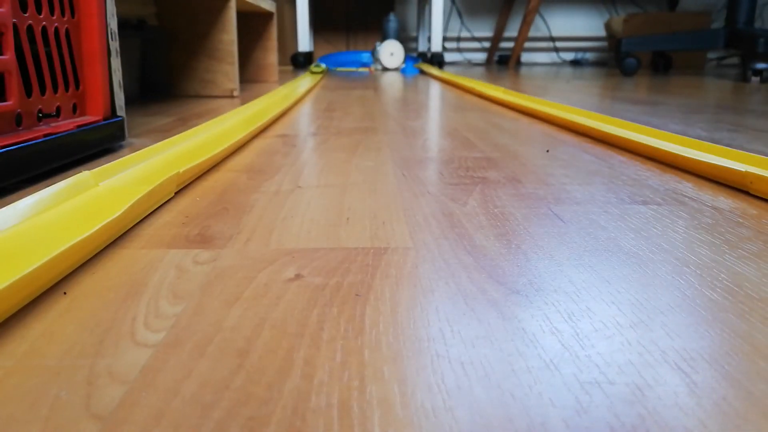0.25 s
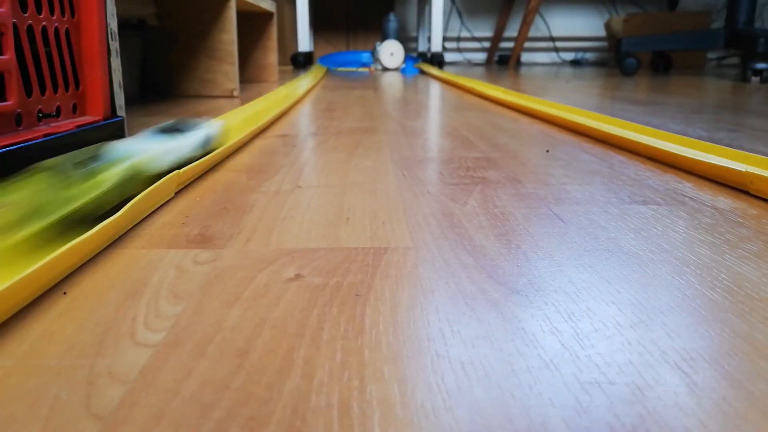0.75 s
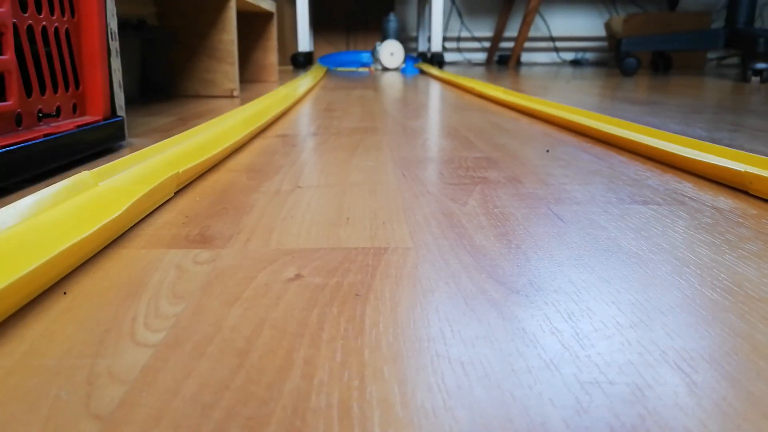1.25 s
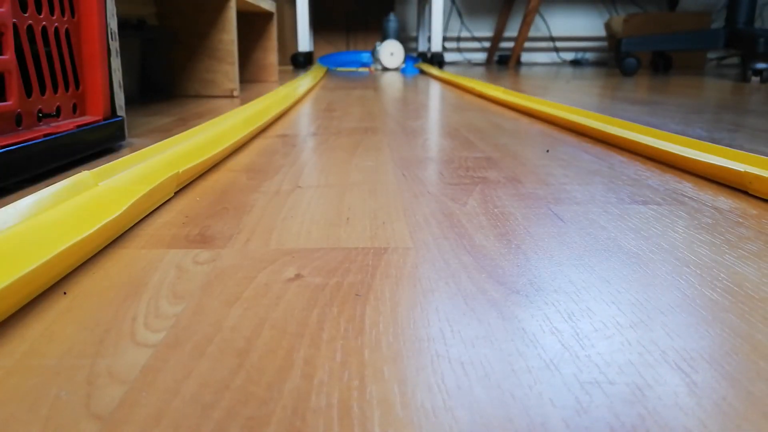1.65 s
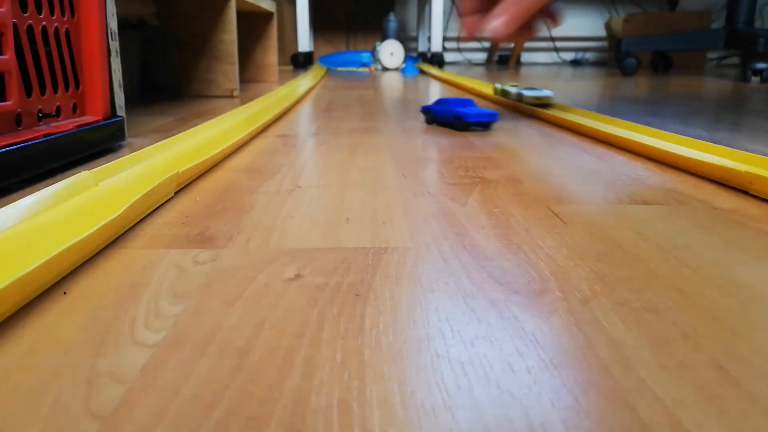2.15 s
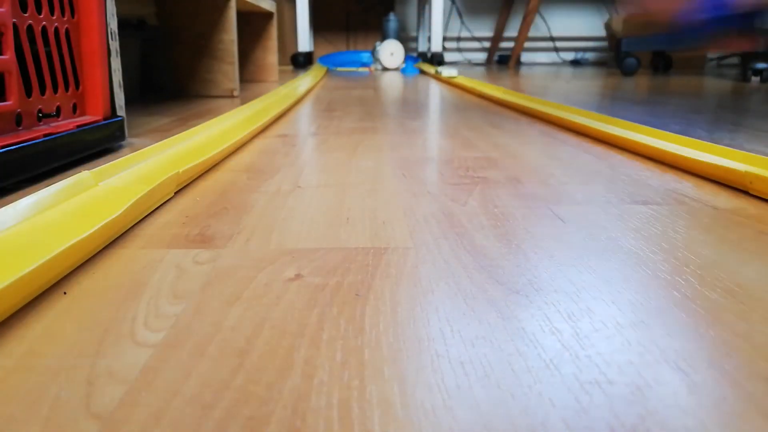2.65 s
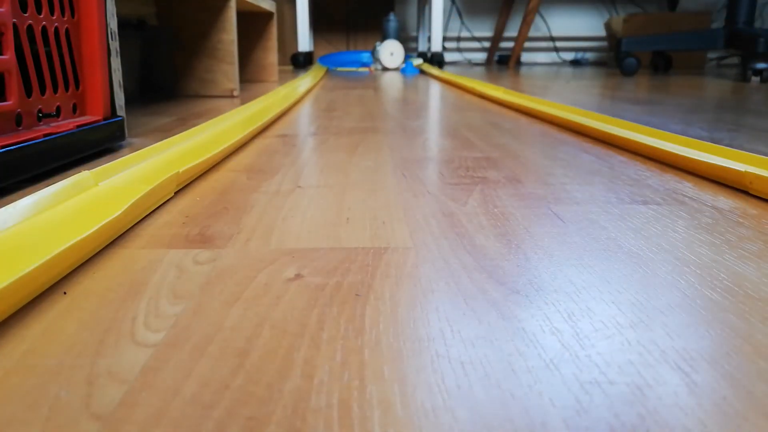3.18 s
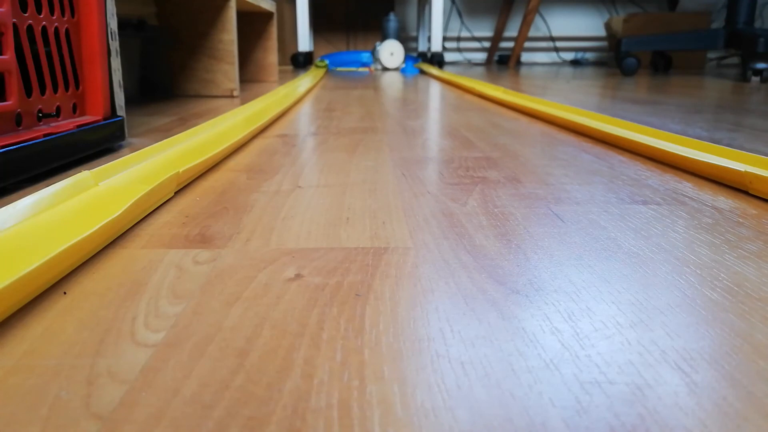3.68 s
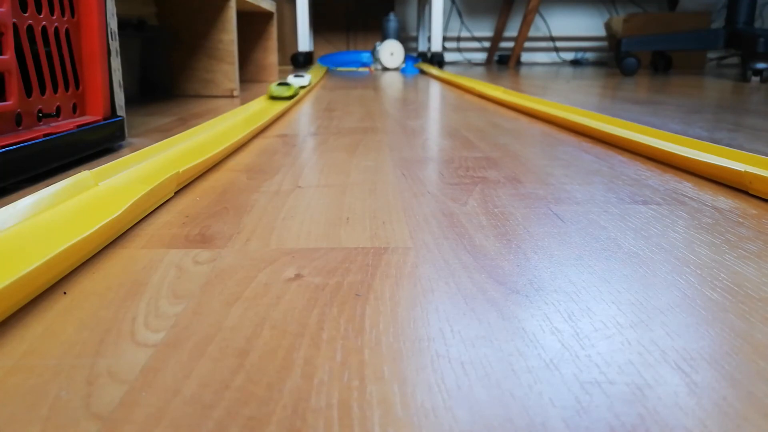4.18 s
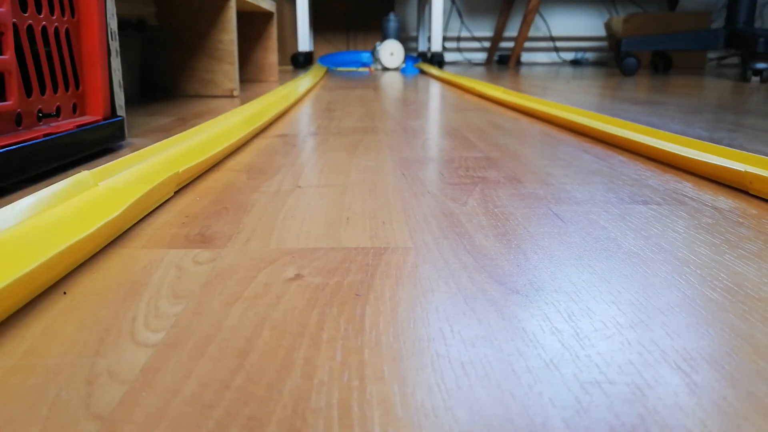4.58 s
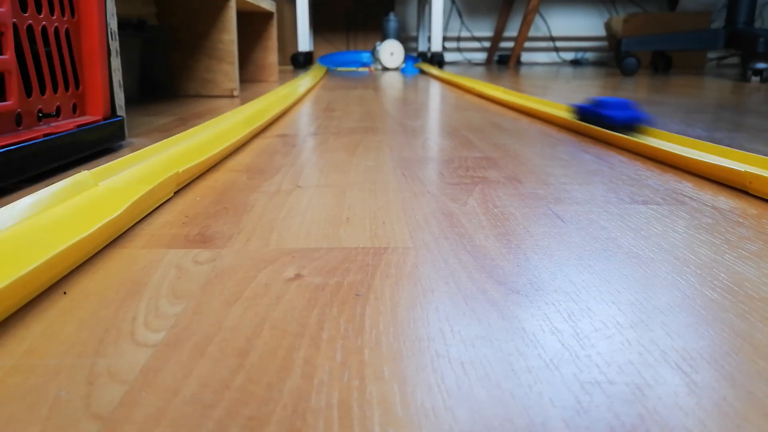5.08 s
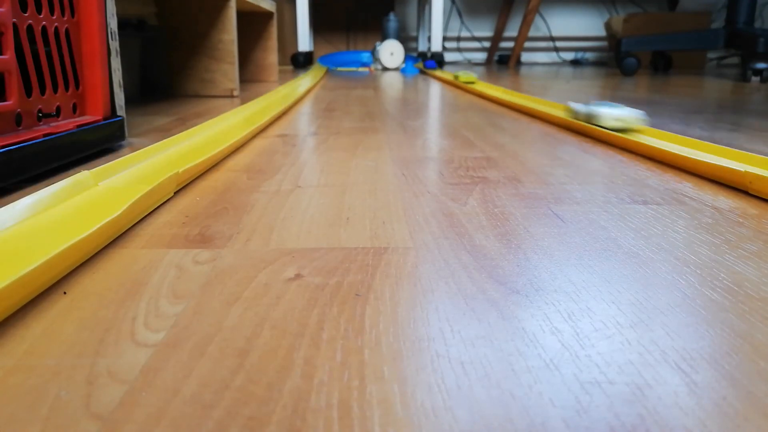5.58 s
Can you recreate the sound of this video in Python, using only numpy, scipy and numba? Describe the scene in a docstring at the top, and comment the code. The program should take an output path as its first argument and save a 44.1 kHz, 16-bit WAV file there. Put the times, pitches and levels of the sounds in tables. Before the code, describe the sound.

Small toy cars whir and rattle round a plastic track, swelling past the microphone with sharp clicks and clattering knocks.

```python
"""Toy cars on a plastic track

Small cars roll round a track on a laminate floor, past a microphone with two openings (ports)
lying between the lanes. Hard wheels chatter and set the car bodies, axles, track and floorboards
ringing. Cars knock at joints and into each other, rub the rail and sing briefly in the loop.
Something heavy thuds once far off, and a small furnished room echoes the knocks and bumps."""
import sys
import numpy as np
from scipy import signal
from scipy.fft import rfft, irfft
from scipy.io import wavfile
from scipy.ndimage import uniform_filter1d
from numba import njit

SR = 44100
rng = np.random.default_rng(int(sys.argv[2]) if len(sys.argv) > 2 else 0)


def inscribe(sig):
    """Save sig as 16-bit PCM at rate SR to the path in sys.argv[1].

    A 1-D sig is mono; a 2-D sig holds one channel per row.
    Samples are clipped to [-1, 1] before scaling.
    """
    pcm = np.round(np.clip(np.atleast_2d(sig).T, -1, 1) * 32767)
    wavfile.write(sys.argv[1], SR, pcm.astype(np.int16))


N = 257103
T = np.arange(N) / SR
PORT_LAG_S = 0.000582  # longest delay between the two ports


# How a car sounds on each stretch. "Pan" is left minus right; drifts are against the body.
# name: swell/(dB/s), fade/(dB/s), pan/dB, axle pan/dB, shell whirr over body/dB,
# then drift/(dB/s) of boards, track and axles
STRETCHES = { "left straight": (42.5, 64, 1.5, 5.5, -2, -7, 2, 10),
             "near bend": (900, 79, 1.2, -1, -9, -89, -46, -28),
             "right straight": (115, 32, -4, -5.5, -1, -14, -50, -5.5),
             "bend exit": (400, 35, -4.5, -6, 0.5, -9, -46, 0),
             "off the track": (71, 28.5, -2.5, 7, -1.5, -30, -13, -1),
             "loop": (520, 99, -1, -0.5, -6.5, 3, 3, -21), "loop foot": (174, 107, 0, 1, -4, 14, -7, -5),
             "far end": (32.5, 13.5, 1, -1, 1.65, -11, -0.3, 2.2), }
# Cars going by: stretch, swell end t/s, fade start t/s, body level/dB, whirr f/Hz,
# then level/dB over the body of boards, track and axles
PASSES = [("loop foot", -0.025, 0.0079, -33.5, 3100, -10, 6.9, 0.44),
          ("far end", 0.32, 1, -39, 3260, -14, -3, -0.52),
          ("left straight", 0.71, 0.74, -35.5, 4300, -4, -2.7, 0.45),
          ("left straight", 0.85, 0.88, -27, 3800, -9.5, -10, 2.4),
          ("near bend", 0.983, 1.118, -23, 3530, -10.5, -7.5, 0.29),
          ("near bend", 1.06, 1.181, -23, 2700, -16, -7.5, -5),
          ("bend exit", 1.295, 1.36, -32.5, 3500, -5.5, 0.47, -0.5),
          ("right straight", 1.597, 1.63, -33.5, 3760, -9, -10, 3.4),
          ("off the track", 1.75, 1.69, -32.5, 3600, -5.5, -9, -5),
          ("off the track", 1.87, 1.9, -37.5, 4300, 1.3, -11, -6.5),
          ("far end", 2.24, 2.31, -41.5, 3260, -7, -4.5, -2.3),
          ("far end", 2.65, 2.58, -43.5, 3560, -9.5, -12, -1.1),
          ("far end", 3.09, 3.12, -42, 3160, -30, -0.89, -2.5),
          ("loop", 3.21, 3.23, -36.5, 1700, -26, 1, -19), ("loop", 3.25, 3.3, -27, 3400, -13, -4, -2.5),
          ("loop", 3.35, 3.506, -27, 3100, -18.5, -4.5, -3),
          ("loop foot", 3.58, 3.57, -34, 3300, -4, 6.2, -0.94),
          ("far end", 3.91, 3.86, -40.5, 3200, -28, -4.5, -0.51),
          ("far end", 4.173, 5.34, -39.5, 3340, -5, -1.1, 1),
          ("left straight", 4.475, 4.53, -30, 3500, -6.5, -6.5, 1.8),
          ("left straight", 4.597, 4.66, -28, 3600, -13, -12, 1.7),
          ("near bend", 4.662, 4.71, -25, 3800, -8, -3, -2),
          ("near bend", 4.735, 4.77, -20.5, 3000, -9.5, -5, -1.5),
          ("near bend", 4.822, 4.89, -22.5, 3300, -14, -8, -1.2),
          ("right straight", 4.99, 5.04, -29.5, 3280, -3.5, -0.81, 0.7),
          ("right straight", 5.26, 5.33, -33.5, 3740, -4.5, -4.5, 1.3),
          ("right straight", 5.5, 5.64, -35, 3360, -5.5, -1.5, 0.44),
          ("loop foot", 5.765, 5.86, -30, 3500, -9, 1.7, -2)]

def traffic():
    """The power of all cars adds up in each part; the loudest cars set the side and the whirr."""
    power = np.full((4, N), 1e-12)  # body, boards, track, axles
    weighted, axle_side = 0, 0
    for stretch, start, end, db, hz, *parts_db in PASSES:
        rise, fall, pan_db, axle_pan_db, whirr_db, *drifts = STRETCHES[stretch]
        body = swell(start, end, db, rise, fall) ** 2
        age = np.maximum(T - start, 0)
        parts = [body * undb(over_db + drift * age) ** 2 for over_db, drift in zip(parts_db, drifts)]
        power += np.array([body, *parts])
        weighted += body * np.array([[pan_db], [hz], [whirr_db]])
        axle_side += parts[-1] * axle_pan_db
    return np.sqrt(power), weighted / power[0], axle_side / power[-1]


# The pitches at which each part likes to ring (its modes): f/Hz, width/Hz, level/dB
BODY_MODES = [(2140, 600, -0.5), (3010, 540, -1.5), (3916, 890, 3), (4750, 2800, -5), (6970, 1750, -2.5)]
SHELL_MODES = [(2680, 305, 1), (3130, 280, -0.9), (3500, 270, -2), (4170, 390, -0.5)]
BOARD_MODES = [(147.3, 46, -11.5), (274, 87, -11), (399.6, 74, 1), (470, 96, -1.5), (667, 159, -0.5)]
TRACK_MODES = [(930, 284, 0.1), (1212, 340, -5), (1615, 320, -3)]
AXLE_MODES = [(7380, 2100, -8.5), (9020, 1270, 1), (10380, 1380, 1), (11076, 1410, -1), (13130, 2100, -13)]

def rolling():
    """The same wheel hops shake cars, track and floorboards; each part also wavers on its own."""
    (body_gain, board_gain, track_gain, axle_gain), (pan_db, hz, whirr_db), axle_pan_db = traffic()
    # hops stand out only from a near car; far ones blend together
    near = np.clip((20 * np.log10(body_gain) + 43) / 20, .15, 1)
    free = (T < 3.2) | (T > 3.7)  # in the loop the wheels are pressed down and cannot hop
    shake = 1 + .65 * near * free * hops(per_s=70, scatter_db=2, fade_s=.004)
    body = rattle(lambda x: flicker(x, BODY_MODES, depth_db=1.2),
                  shake * waver(1.3, 30), pan_db, shared=.17)
    hz = hz * (1 + .04 * wander(9))  # the whirr wanders as cars speed up and slow down
    whirr = rattle(lambda x: sweep(ring(x, SHELL_MODES), hz, 850.),
                   shake * waver(2, 30), pan_db, shared=.3)
    boards = rattle(lambda x: ring(x, BOARD_MODES),
                    shake * waver(2.2, 35), pan_db, shared=.73, grain_db=1.8)
    track = rattle(lambda x: ring(x, TRACK_MODES), shake * waver(1.5, 40), pan_db, shared=.4)
    axles = rattle(lambda x: flicker(x, AXLE_MODES, depth_db=1.1),
                   shake * waver(1.6, 30), axle_pan_db, shared=.05, grain_db=2.4)
    car = body_gain * (body + undb(whirr_db) * whirr)
    return car + board_gain * boards + track_gain * track + axle_gain * axles


def hops(per_s, scatter_db, fade_s):
    """Wheels hop at random moments; each jolt swells briefly and dies away."""
    kicks = (rng.random(N) < per_s / SR) * undb(scatter_db * rng.standard_normal(N))
    fading = signal.lfilter([1], [1, -np.exp(-1 / (fade_s * SR))], kicks)
    return uniform_filter1d(fading, SR // 250)


def chatter(grain_db, n=N):
    """Countless tiny contacts; more grain makes their sizes more uneven."""
    return rng.standard_normal(n) * undb(grain_db * rng.exponential(size=n))


def rattle(part, shake, pan_db, shared, grain_db=2.2):
    """Wheels rattle a part. One car's shared sound reaches the nearer port first; the rest differs."""
    common, left, right = (unit(part(chatter(grain_db) * shake)) for _ in range(3))
    lag = PORT_LAG_S * np.tanh(uniform_filter1d(pan_db, SR // 4) / 0.5) / 2
    one_car = np.array([np.interp(T + lag, T, common), np.interp(T - lag, T, common)])
    return (np.sqrt(shared) * one_car + np.sqrt(1 - shared) * np.array([left, right])) * pan(pan_db)


# Cars hitting joints and each other: t/s, level/dB, ring f/Hz, axles over body/dB, pan/dB
KNOCKS = [(0.925, -18.5, 3070, 8.5, 7), (0.984, -9.5, 3080, -4, -8), (1.019, -7, 3060, -2, -8),
          (1.085, -15, 3400, 0, 0), (1.111, -11.5, 3000, 0, 1), (1.1871, -13.5, 2700, -19, -2),
          (1.261, -16.5, 4360, -4, 1), (1.2929, -20, 2780, 7.5, -4), (1.3538, -13.5, 3120, -3, -3),
          (1.459, -18, 2230, 5, -19), (1.4636, -16, 3180, 2, -17), (1.609, -24.5, 3800, 14, -16),
          (1.6746, -15, 3900, 3.5, -9), (1.7235, -12, 3050, -4, -11), (1.7374, -13, 4400, -2, -4),
          (1.756, -18, 4900, 4, 7), (1.8368, -20, 1900, -14, 7), (1.9019, -10, 3550, 3.5, 1.5),
          (1.913, -32, 3760, 16, 10), (1.961, -18, 3460, 1, 6), (2.0084, -17, 3980, -7, -1),
          (2.0407, -23, 3500, 1, -3), (2.081, -24, 3300, -8, 1), (2.105, -26.5, 2500, 0, 5),
          (2.152, -26, 2810, -4, 3), (2.277, -30.5, 3500, 4, -1), (2.33, -38, 4300, 7, -6),
          (3.249, -19, 2590, 9, -10), (4.083, -21, 2580, -2, -10), (4.352, -18, 3140, 1, 1),
          (4.4134, -22, 4050, 7, 6), (4.53, -20.5, 2800, 8.5, 15), (4.589, -24, 3700, 2, 4),
          (4.694, -16, 3930, -7, -10), (4.7293, -19, 3810, 4, -9), (4.7741, -7, 2900, -2, -4),
          (4.827, -13.5, 2260, 4, 2), (4.8639, -18, 2660, -8, 7), (4.8848, -15, 3700, -1, -5),
          (4.953, -18, 3700, 10.5, -3), (4.9694, -30, 2620, 2, -5), (5.009, -18, 3360, 2, 0),
          (5.08, -16, 3170, 2.5, -10), (5.26, -24, 3470, 6, -5), (5.315, -28, 3500, 9, -6),
          (5.328, -28, 3500, 7, -5), (5.354, -29, 4000, 9, -3), (5.374, -25, 4000, 10, 0),
          (5.5142, -21, 3780, 10, 0), (5.565, -28.5, 3460, 12, -4)]

def knocks():
    """A sharp contact and a moment of clatter ring the shell, body, track, boards and axles."""
    out, n = np.zeros((2, N + SR)), SR // 16
    rise_s, shell_width_hz, contact = .003, 520, SR // 300
    age = np.arange(n) / SR / rise_s
    envelope = (age * np.exp(1 - age)) ** 2
    for s, db, hz, axles_db, pan_db in KNOCKS:
        blow = rng.standard_normal((2, n)) * undb(3 * rng.exponential(size=n)) * envelope
        blow[:, contact] += 6
        parts = [([(hz, shell_width_hz, 0)], -1.5), (BODY_MODES + TRACK_MODES[1:], 0),
                 (BOARD_MODES[2:], -18.5), (AXLE_MODES, axles_db)]
        i = int(s * SR) - contact
        out[:, i:i + n] += undb(db) * strike(blow, parts) * pan(pan_db)
    return out[:, :N]


# Wheels dropping over track joints: t/s, level/dB, ring f/Hz
BUMPS = [(0.808, -12.5, 650), (1.049, -8.5, 1000), (1.087, -20.5, 443), (1.283, -15.5, 1400),
         (1.294, -13, 750), (1.356, -11, 780), (1.456, -25.5, 447), (1.673, -20.5, 515), (1.836, -8, 524),
         (1.897, -16, 595), (1.943, -19.5, 471), (4.381, -25, 456), (4.438, -13, 645), (4.528, -21, 600),
         (4.619, -19, 1330), (4.681, -9, 1260), (4.685, -17.5, 466), (4.725, -23, 990), (4.744, -23, 1020),
         (4.774, -12.5, 520), (4.817, -19, 1020), (4.953, -14.5, 640), (5.006, -25, 1000),
         (5.041, -31, 1230), (5.074, -14, 650), (5.082, -17, 950), (5.512, -18, 600), (5.577, -24.5, 500)]
# How a joint rings: f/Hz, width/Hz, level/dB
JOINT_MODES = [(465, 160, -14), (820, 300, 11)]

def bumps():
    """A wheel drops with a dull tap that has its own pitch, over the softer ring of the joint."""
    out, n = np.zeros(N + SR), SR // 10
    tap, sharpness = signal.unit_impulse(n), 2.6
    for s, db, hz in BUMPS:
        i = int(s * SR)
        out[i:i + n] += undb(db) * strike(tap, [([(hz, hz / sharpness, 0)], 0), (JOINT_MODES, -14)])
    return from_right(out[:N])


# Cars passing close by: t/s, level/dB before each port's gain, fade/(dB/s), scrape over hiss/dB
CLOSE_PASSES = [(1.41, -20, 242, -1), (1.53, -26, 72, -2), (1.76, -41, 120, 18), (1.81, -45, 300, 18),
                (3.25, -38, 600, 1), (3.348, -29, 191, 4.5)]
# How the right port rings: f/Hz, width/Hz, level/dB
RIGHT_PORT_HISS_MODES = [(13200, 1650, -11), (13500, 430, -2.5), (14800, 680, -20)]
# The scrape's two moving bands: t/s, low f/Hz, high f/Hz, low over high/dB
SCRAPE_BANDS = [(1.3, 2090, 4200, 2), (1.38, 2050, 4500, 1.5), (1.46, 2100, 5150, 3),
                (1.51, 1830, 4670, 2.5), (1.6, 1760, 4840, 2), (1.68, 1900, 4360, -18),
                (1.83, 1970, 5000, -14), (3.3, 2000, 5340, 2)]

def close_passes():
    """A car passing close by sets the right port ringing with a thin, high hiss, over a rail scrape."""
    rise_db_s = 289
    hiss_ports, scrape_ports = undb([[-15], [5]]), undb([[-13], [-5.5]])  # left, right
    hiss_gain = sum(swell(s, s, db, rise_db_s, fade) for s, db, fade, _ in CLOSE_PASSES)
    scrape_gain = sum(swell(s, s, db + over, rise_db_s, fade) for s, db, fade, over in CLOSE_PASSES)
    scrape_gain = uniform_filter1d(scrape_gain, SR // 10)
    hiss = np.array([unit(ring(chatter(2.5) * waver(2.5, 40), RIGHT_PORT_HISS_MODES)) for _ in range(2)])
    times, *columns = np.transpose(SCRAPE_BANDS)
    low_hz, high_hz, low_db = (np.interp(T, times, column) for column in columns)
    scrape = np.zeros((2, N))
    for port in range(2):
        rub = chatter(3.2) * waver(3, 40)
        low = unit(sweep(sweep(rub, low_hz, 560.), low_hz, 560.))
        high = unit(sweep(sweep(rub, high_hz, 750.), high_hz, 750.))
        scrape[port] = undb(low_db) * low + high
    return hiss_gain * hiss * hiss_ports + scrape_gain * scrape * scrape_ports


# Brief tones: start t/s, end t/s, level/dB, start f/Hz, end f/Hz, pan/dB
LOOP_TONES = [(0.01, 0.03, -37, 892, 903, -3), (3.29, 3.3, -37, 1540, 1520, -1),
              (3.455, 3.475, -34, 920, 886, -3), (3.575, 3.61, -34, 905, 920, -8),
              (3.572, 3.6, -34, 1116, 1078, -3), (3.67, 3.7, -44.5, 950, 1100, -6)]  # the hollow of the loop sings under a car
SHELL_WHINES = [(0.75, 0.82, -37, 3990, 4030, 5), (0.86, 0.92, -36.5, 2900, 3210, 14),
                (0.985, 1.025, -31, 3126, 3170, -6), (1.13, 1.19, -34, 2345, 2640, -1),
                (1.205, 1.25, -35, 2850, 2760, -3), (4.76, 4.79, -33, 2930, 2810, -1),
                (4.84, 4.89, -31, 2695, 2860, -1)]  # the shell of a fast car sings
HIGH_TONES = [(1.39, 1.44, -34, 13300, 13300, -16), (1.5, 1.58, -39, 13550, 13500, -16),
              (3.32, 3.37, -41, 13400, 13450, -14)]  # brief, thin, very high tones on the right

def singing(tones, wobble):
    """Short unsteady tones glide from one pitch to another; wobble is a share of the pitch."""
    out = 0
    for start, end, db, hz, end_hz, pan_db in tones:
        pitch = np.interp(T, [start, end], [hz, end_hz]) * (1 + wobble * wander(150))
        tone = np.sqrt(2) * np.sin(2 * np.pi * np.cumsum(pitch) / SR) * waver(2.6, 64)
        out += tone * swell(start, end, db, rise_db_s=700, fall_db_s=350) * pan(pan_db)
    return out


# Wheels coming up the long straight: start t/s, end t/s, level/dB
DRUM_SPELLS = [(0.394, 0.414, -41.5), (0.643, 0.65, -41.5), (3.97, 3.983, -42), (4.264, 4.407, -40.5)]

def drumming():
    """The long straight hums at one hollow pitch, throbbing with the wheels."""
    hz, width_hz = 400, 90
    gain = sum(swell(*spell, rise_db_s=158, fall_db_s=101) for spell in DRUM_SPELLS)
    hum = unit(ring(chatter(2.2) * waver(2.5, 45), [(hz, width_hz, 0)]))
    return from_right(gain * hum)


def thud():
    """A soft, heavy blow on the boards: one low note that sags in pitch, holds a moment and dies."""
    start_s, db, hz, rise_s, hold_s, fade_s = 3.007, -33, 162, .006, .035, .12
    t = np.maximum(T - start_s, 0)
    gain = undb(db - 60 * np.maximum(t - hold_s, 0) / fade_s) * (1 - np.exp(-t / rise_s))
    return gain * np.sin(2 * np.pi * (hz - 210 * t) * t)


def room_echo(sound, fade_s=.12, db=-8.5):
    """The room sends back a quickly fading cloud of dulled echoes, different at each port."""
    t = np.arange(SR // 3) / SR
    tail = rng.standard_normal((2, len(t))) * undb(-60 * t / fade_s) * (t > .003)
    tail = signal.lfilter([.6], [1, -.4], tail)  # soften the treble
    tail /= np.sqrt(np.sum(tail ** 2, axis=1, keepdims=True))
    return undb(db) * signal.fftconvolve(sound.mean(axis=0)[None], tail, axes=1)[:, :N]


# The tone of the room's hush: f/Hz, relative level/dB
HUSH_SHAPE = [(25, -7), (70, 0.5), (150, 1), (300, 2.5), (1000, -8.5), (4000, -5.5), (15500, -48)]

def room_hush(db=-50.5):
    """Quiet, wavering background noise; its bass is nearly the same at both ports."""
    hz = np.maximum(np.arange(N // 2 + 1) * SR / N, 1)
    shape_hz, shape_db = np.transpose(HUSH_SHAPE)
    colour = undb(np.interp(np.log(hz), np.log(shape_hz), shape_db))
    mid, side = rfft(rng.standard_normal((2, N))) * colour
    side *= np.clip(hz / 530, .4, 1)
    return undb(db) * waver(3, 12) * unit(irfft(np.array([mid + side, mid - side]), N))


def ring(x, modes):
    """Let a sound ring a part; each mode filters it twice to keep stray pitches out."""
    out = 0
    for k, (hz, width_hz, db) in enumerate(modes):
        b, a = signal.iirpeak(hz, hz / (1.79 * width_hz), SR)
        out += (-1) ** k * undb(db) * signal.lfilter(b, a, signal.lfilter(b, a, x))
    return out


def flicker(x, modes, depth_db):
    """Ring a part while each of its modes swells and sinks on its own."""
    return sum((-1) ** k * ring(x, [mode]) * waver(depth_db, 9) for k, mode in enumerate(modes))


def strike(blow, parts):
    """One blow rings several parts, each given as (modes, peak level/dB)."""
    rings = [(ring(blow, modes), db) for modes, db in parts]
    return sum(undb(db) * x / np.abs(x).max() for x, db in rings)


@njit
def sweep(x, hz, width_hz):
    """Let through one band of pitches whose centre moves."""
    out, band_state, low_state = np.empty(len(x)), 0., 0.
    for i in range(len(x)):
        step, damping = np.tan(np.pi * hz[i] / SR), width_hz / hz[i]
        band = (band_state + step * (x[i] - low_state)) / (1 + step * (step + damping))
        band_state = 2 * band - band_state
        low_state += 2 * step * band
        out[i] = damping * band
    return out


def swell(start, end, db, rise_db_s, fall_db_s):
    """A gain that rises until start and fades after end."""
    return undb(db - rise_db_s * np.maximum(start - T, 0) - fall_db_s * np.maximum(T - end, 0))


def wander(per_s):
    """A line that slides between random values, mostly within -1 to 1."""
    hold = int(SR / per_s)
    return uniform_filter1d(np.repeat(rng.standard_normal(N // hold + 1), hold), hold)[:N]


def waver(depth_db, per_s):
    """A gain that drifts up and down at random."""
    return undb(depth_db * wander(per_s))


def pan(db):
    """Left and right gains, with the left louder by db."""
    return undb(np.vstack([db, -db]) / 2)


def from_right(x):
    """A sound from the right reaches the left port a little late."""
    return np.array([np.interp(T - PORT_LAG_S, T, x), x])


def undb(db):
    """Turn decibels into a gain."""
    return 10 ** (np.asarray(db) / 20)


def unit(x):
    """Scale a sound to an average power of 1."""
    return x / np.sqrt(np.mean(x ** 2))


def scene():
    """All sources at the two ports; only knocks and bumps get an echo."""
    hits = knocks() + bumps()
    mix = rolling() + close_passes()
    mix += singing(LOOP_TONES, wobble=.03)
    mix += singing(SHELL_WHINES, wobble=.045)
    mix += singing(HIGH_TONES, wobble=.008)
    return mix + drumming() + hits + room_echo(hits) + thud() + room_hush()


# The treble ring each port adds, left then right: f/Hz, width/Hz, level/dB
PORT_MODES = [(10100, 1130, -2.5), (11360, 1000, -2)]

def record(dry):
    """Each port lifts its own treble band; loud peaks are rounded and the highest treble is cut."""
    heard = np.array([x + ring(x, [mode]) for x, mode in zip(dry, PORT_MODES)])
    rounded = np.tanh(0.8 * heard) / 0.79
    treble_cut = signal.ellip(10, .2, 70, 15600, fs=SR, output="sos")
    return signal.sosfilt(treble_cut, rounded)


dry = scene()
out = record(dry)
inscribe(out)
```